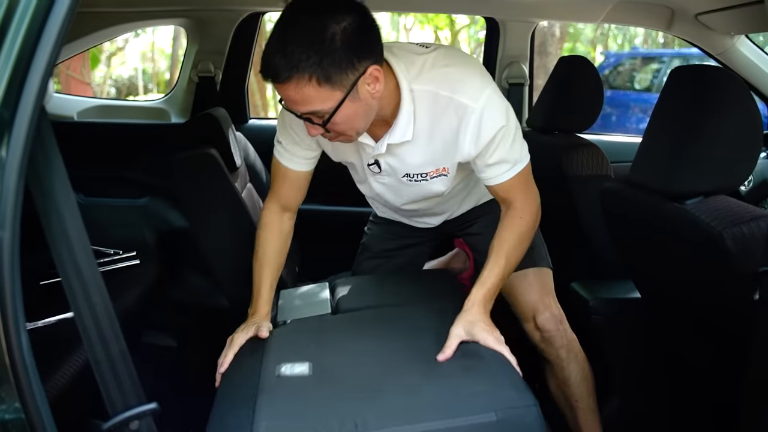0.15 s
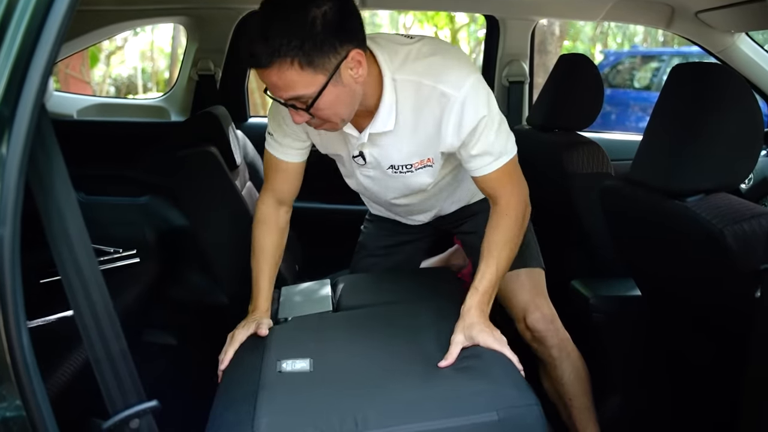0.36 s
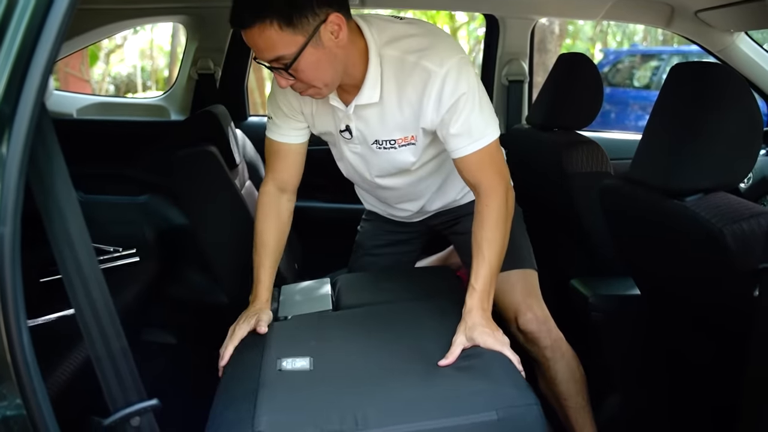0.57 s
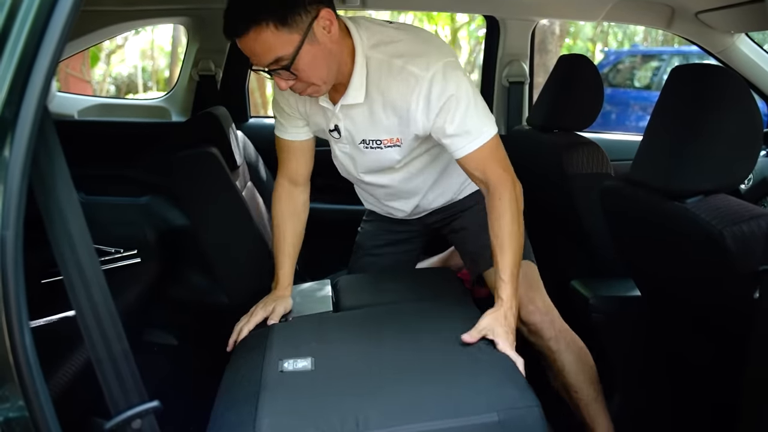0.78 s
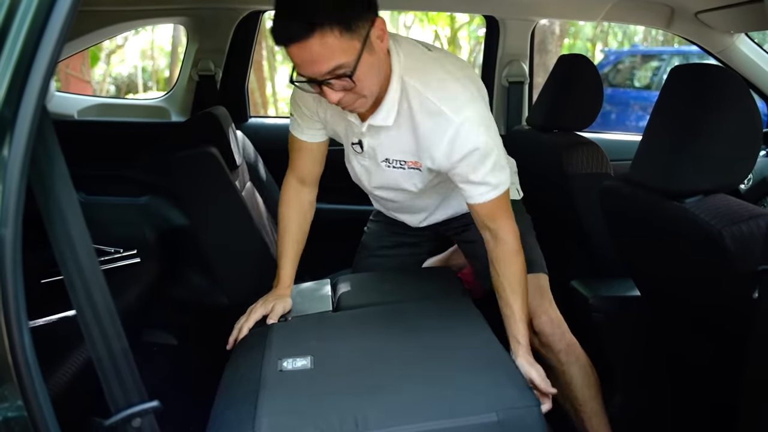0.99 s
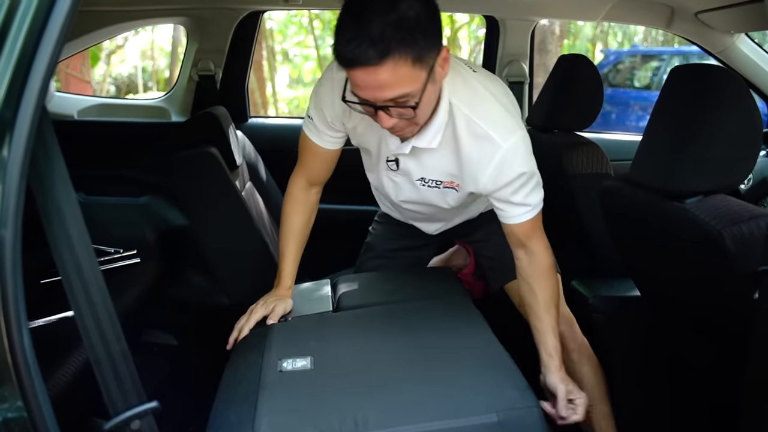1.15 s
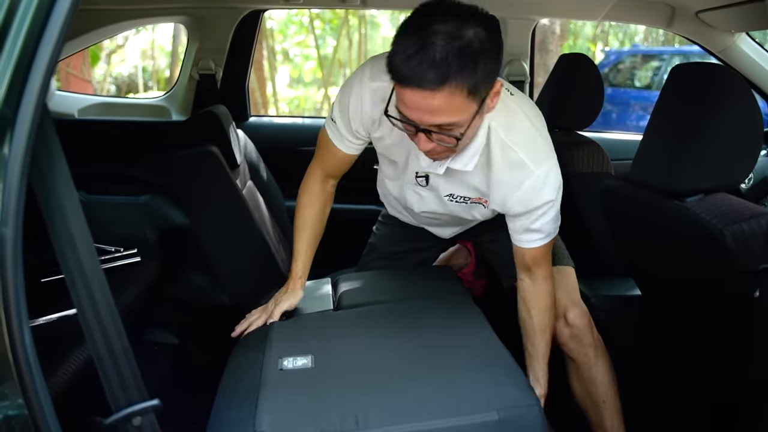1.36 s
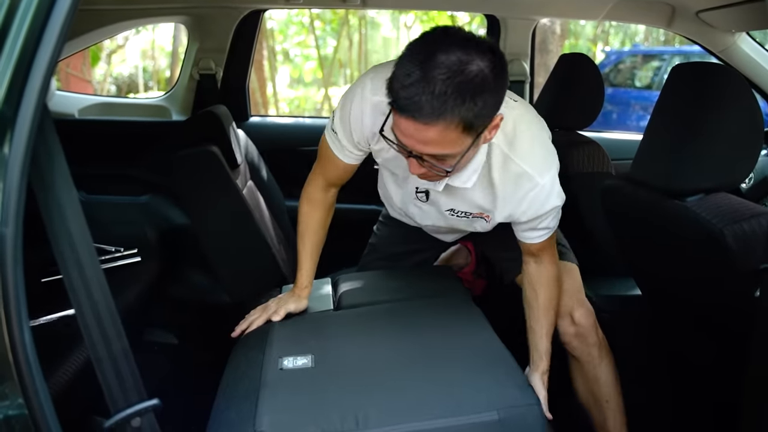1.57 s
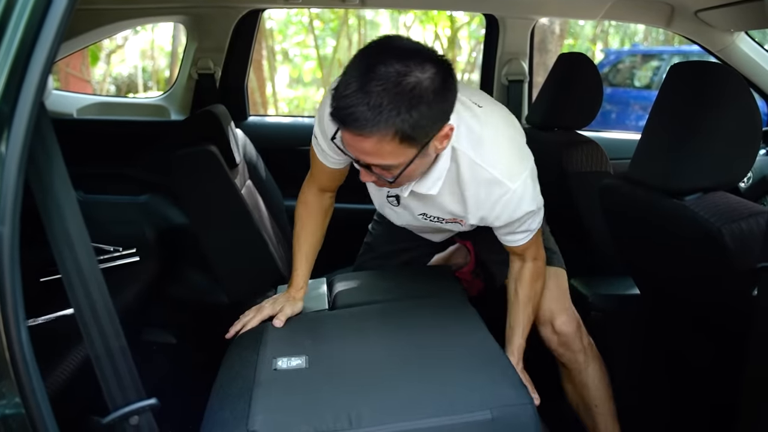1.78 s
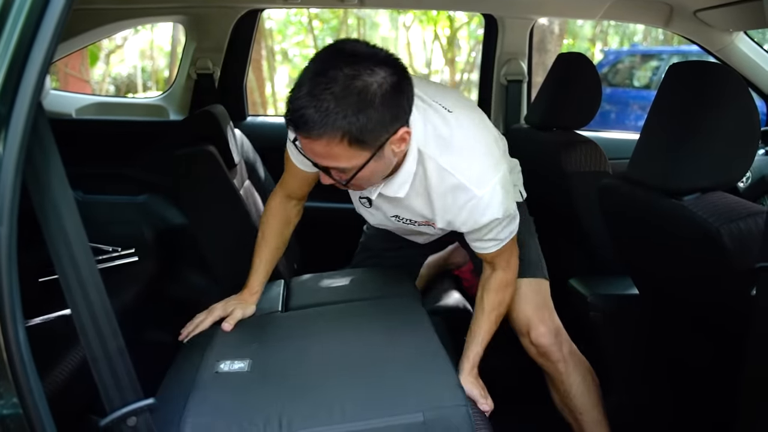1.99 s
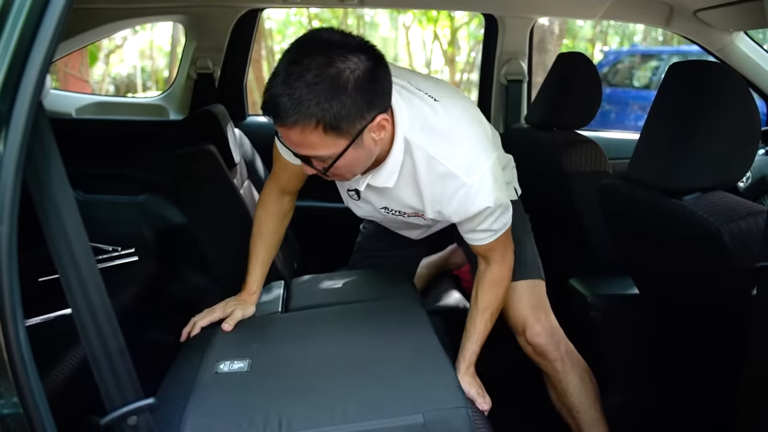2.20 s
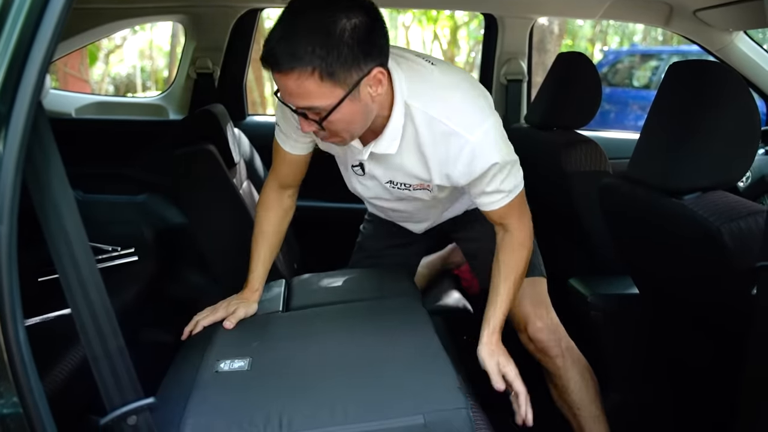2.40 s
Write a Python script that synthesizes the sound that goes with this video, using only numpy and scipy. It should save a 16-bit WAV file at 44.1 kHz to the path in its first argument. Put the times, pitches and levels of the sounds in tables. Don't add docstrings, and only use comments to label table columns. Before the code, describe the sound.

Folding car seat drops with a padded thump, light hand taps follow, then a latching clunk.

```python
import sys
import numpy as np
from scipy import signal
from scipy.fft import rfft, irfft
from scipy.io import wavfile
from scipy.ndimage import map_coordinates

SR = 44100
rng = np.random.default_rng(int(sys.argv[2]) if len(sys.argv) > 2 else 0)


def how_loud(loudness_db):
    steps = np.asarray(loudness_db, float) / 20
    return 10 ** steps


def transcribe(u):
    v = np.clip(np.atleast_2d(u).T, -1, 1)
    q = np.round(v * 32767).astype(np.int16)
    wavfile.write(sys.argv[1], SR, q)


N = 108045

# start_s, level_db, contact_ms, favoured_hz
KNOCKS = [(0.2037, -22, 0.86, 500), (.211, -21, 1.4, 557), (0.2168, -14, 0.92, 410),
          (.221, -17.5, 0.61, 252), (0.2245, -20, 0.14, 720), (.240, -14, 1.3, 252),
          (0.246, -20.5, 0.59, 286), (.252, -34, 0.73, 280), (0.261, -27, 0.84, 560),
          (0.271, -31.5, 0.39, 260), (.282, -28, 0.92, 600), (.288, -46, 1.2, 260), (0.3, -24, 2.4, 150),
          (2.039, -30, 0.31, 600), (2.0455, -19.5, 0.98, 400), (2.0492, -17.5, 0.8, 380),
          (2.0535, -19, 1.05, 397), (2.058, -16, 0.81, 380), (2.0625, -19, 0.69, 764),
          (2.066, -15, 0.53, 169), (2.082, -19.5, 1.2, 280), (2.0978, -24, 0.49, 730),
          (2.124, -29, 1.07, 450), (2.134, -23, 1.3, 314), (2.151, -26, 2, 150)]
# pitch_hz, level_db, fade_60db_s
FRAME_TONES = [(68, -22, 0.24), (98, -3.5, 0.079), (150, -3, 0.13), (205.2, -2, 0.1), (261.3, -1, 0.091),
               (301, 0.5, 0.083), (388.4, -3, 0.077), (464, -9, 0.055), (553.5, -1, 0.039),
               (607, -6.5, 0.09), (687.6, -3.5, 0.052), (781.5, -8.5, 0.078), (915, -7.5, 0.024),
               (1190, -29, 0.037)]
# peak_s, level_db, rise_s, fade_60db_s, contact_ms
SHUDDERS = [
    (0.242, -29.5, 0.021, 0.37, 1.3),
    (.42, -57, 0.11, 0.98, 2.13),
    (1.789, -52, 0.017, 0.11, 1.22),
    (1.93, -48, 0.035, 0.99, 1.7),
    (2.01, -42.5, 0.055, 0.71, 1),
    (2.1, -36, 0.039, 0.35, 0.3),
    (2.25, -49, 0.25, 0.79, 3.3),
]
# start_s, level_db, pitch_hz,
# fade_60db_s
TAPS = [(.2028, -15, 307, 0.019), (1.915, -44, 265, 0.14), (1.995, -36, 267, 0.089),
        (0.516, -43, 150.6, 0.16), (0.959, -47, 212, 0.081), (1.3289, -47.5, 410, 0.024),
        (1.363, -48, 474, 0.051), (1.415, -51, 569.5, 0.15), (1.424, -49.5, 565, 0.059),
        (1.431, -44, 271, 0.092), (1.439, -37.5, 207, 0.064), (1.5123, -44, 654, 0.018),
        (1.525, -46, 510, 0.022), (1.775, -51, 310.4, 0.051), (1.792, -54, 316, 0.032),
        (1.998, -46, 620, 0.035), (1.785, -65, 630, 0.043), (1.42, -58, 670, 0.092)]
# start_s, level_db, pitch_hz, fade_60db_s
CLINKS = [(0.2146, -35, 1186, 0.1), (0.2201, -32, 5630, 0.018), (0.233, -34, 3090, 0.082),
          (.26, -40, 1233, 0.069), (.281, -51, 6600, 0.027), (1.326, -62, 4900, 0.013),
          (1.5642, -58, 6160, 0.018), (1.5645, -75, 10800, .02), (2.046, -31, 1997, 0.057),
          (2.05, -36, 1590, 0.11), (2.064, -38, 5570, 0.025), (2.072, -40, 3620, 0.059)]
# peak_s, level_db, rise_s, fade_60db_s, brightness_db_per_octave
CRUNCHES = [(0.203, -45, 0.00082, .03, -8), (0.211, -35.5, 0.0013, 0.074, -3.5),
            (0.2204, -29.5, 0.0011, 0.012, 2), (.231, -29.5, 0.004, 0.085, 1),
            (.242, -33.5, 0.0035, 0.063, -1), (0.263, -44.5, 0.0025, 0.072, -1.5),
            (0.282, -48.5, 0.0028, 0.09, -0.5), (0.324, -53, 0.0032, .05, -3.5),
            (.35, -59, 0.011, 0.16, -3), (1.317, -65, 0.0095, 0.044, 3.5),
            (1.329, -55.5, 0.00061, 0.0043, 3), (1.365, -65, 0.00085, 0.062, 2),
            (1.423, -51, 0.0057, 0.051, 3.5), (1.513, -78, 0.00077, .02, -16),
            (1.565, -61, 0.0012, 0.026, 2), (1.64, -65, 0.0036, 0.052, 7.5), (2.019, -60, 0.036, 0.17, -9),
            (2.041, -39.5, .0008, 0.03, -2), (2.051, -28, 0.0047, 0.089, 0),
            (2.065, -32.5, 0.0023, 0.046, 1.5), (2.081, -48, .004, .06, -13),
            (2.097, -49, 0.0022, 0.11, -2), (2.126, -46.5, 0.0015, 0.059, -5),
            (2.151, -56.5, 0.0039, 0.1, -4)]
# pitch_hz, level_db_per_hz
CRUNCH_COLOUR = [(530, -59), (950, -13.5), (1250, -2), (1780, -13.5), (2030, -6.5), (5630, -12.5),
                 (12700, -25.5), (15800, -31.5)]
SPRING_HZ = [1497, 1990, 2449, 2519, 2799, 2934, 3359, 3715, 3752, 4269, 4366, 6900]
# level_db, fade_60db_s, damped_at_s
SPRING_TONES = [(-12, 4.1, 0.56), (-27, 5.6, 1), (-10.5, 11, 0.625), (-3, 7, 0.563), (-10, 3, 0.74),
                (-14, 4.1, 0.77), (-19, 6.8, 0.73), (-20, 8.1, 0.55), (-19, 6.2, 0.63), (-18, 7, 0.8),
                (-18.5, 4.3, 0.77), (-23, 1, 0.49)]
# start_s, pitch_hz, level_db, damped_at_s
REVIVALS = [
    (.61, 2449, -63, .73),
    (.635, 2519, -67, .72),
    (.71, 1497, -71, .77),
]
STRIKER_HZ = [4274, 6062, 6158, 3320]
# level_db, fade_60db_s, damped_at_s
STRIKER_TONES = [(-20.5, 1.5, 9), (-13, 0.23, 9), (-2, 0.48, 9), (-19.5, 1.6, 9)]
# start_s, pitch_hz, level_db, fade_60db_s, damped_at_s
PANEL_HUMS = [
    (.208, 125, -29, .5, .25),
    (.252, 95, -24, .9, .325),
    (.35, 95, -41, .9, .405),
    (.375, 262, -44, .55, 1),
    (.236, 275, -21, .3, .262),
    (2.048, 308, -18.5, .4, 2.074),
    (2.08, 295, -29, .4, 2.105),
    (2.138, 105, -30, .5, 2.18),
    (2.175, 256, -39, .6, 3),
]
# middle_s, level_db, half_width_s, brightness_db_per_octave
BRUSHES = [(.5, -70, 0.29, -2.5), (.11, -67.5, 0.074, -2), (.78, -63.5, 0.034, -0.5),
           (.88, -63.5, 0.062, -3.5), (.95, -68, 0.032, -2.5), (1.21, -68.5, 0.031, -1.5),
           (1.39, -69.5, 0.032, 0.5), (1.048, -71, 0.17, -4), (1.608, -65, 0.019, -2.5),
           (1.72, -74, 0.067, 1), (2.014, -49, 0.05, -6)]
# pitch_hz, level_db_per_hz
CLOTH_COLOUR = [(350, -36), (600, -3), (697, -14.5), (1070, -10.5), (1140, -15.5), (3750, -11.5),
                (15800, -25.5)]
# start_s, length_s, start_hz, middle_hz, end_hz
BIRD_NOTES = [
    (1.12, .04, 9800, 10250, 9700),
    (1.145, .04, 14300, 13600, 12600),
    (1.52, .078, 4350, 4800, 6400),
]
BIRD_DB = [-79, -85, -72]
# pitch_hz, level_db_per_hz
RUMBLE_COLOUR = [(15, -87), (25, -43), (80, -9), (122, 0.5), (262, -6.5), (323, -13.5), (525, -16.5),
                 (703, -25.5), (1200, -36), (1560, -78.5), (2640, -120)]
# pitch_hz, level_db_per_hz
AIR_COLOUR = [(350, -54), (600, -9), (697, -2), (1790, -9), (4400, -11.5), (5000, -17), (13500, -27.5),
              (15800, -39)]
# pitch_hz, level_db
MIC_BASS = [(20, -33), (60, -6.5), (110, 0)]
# pitch_hz, level_db
TREBLE_LIMIT = [(15600, 0), (15850, -90)]

SHUDDER_PER_S = 1500
FAVOUR_DB = 4
SPRING_S, SPRING_DB = 0.25, -53
STRIKER_S, STRIKER_DB = 2.07, -57
RUMBLE_DB, AIR_DB = -58, -69
CABIN_T60_S, CABIN_DB = 0.15, -8.5


def unit(x):
    return x / np.sqrt(np.mean(x ** 2) + 1e-20)


def coloured(x, points, tilt_db=0):
    hz = np.fft.rfftfreq(len(x), 1 / SR) + 1
    point_hz, point_db = np.transpose(points)
    level_db = np.interp(np.log(hz), np.log(point_hz), point_db) + tilt_db * np.log2(hz / 4000)
    return irfft(rfft(x) * how_loud(level_db), len(x))


def wobble(rate, size=N):
    knots = rng.standard_normal(int(size * rate / SR) + 4)
    return map_coordinates(knots, [np.arange(size) * rate / SR])


def swell(s, rise, t60):
    t = np.arange(N) / SR - s
    growing = np.exp(-0.5 * (t / max(rise, 1e-4)) ** 2)
    fading = how_loud(-60 * np.abs(t) / max(t60, 1e-3))
    return np.where(t < 0, growing, fading)


def grit(spiky_db, size=N):
    return unit(rng.standard_normal(size) * how_loud(spiky_db * wobble(1500, size=size)))


def pressed(x, ms):
    push = np.hanning(int(ms * SR / 1000) + 3)
    return signal.fftconvolve(x, push / push.sum())[:len(x)]


def frame_modes():
    t = np.arange(SR // 2) / SR
    hz, level, t60 = np.transpose(FRAME_TONES)[:, :, None]
    return how_loud(level - 60 * t / t60) * np.sin(2 * np.pi * hz * t)


def knocks(modes):
    out = np.zeros(N + SR)
    hz = np.transpose(FRAME_TONES)[0]
    for s, db, ms, near_hz in KNOCKS:
        size, side = rng.standard_normal((2, len(FRAME_TONES)))
        strength = how_loud(1.54 * size - FAVOUR_DB * np.log2(hz / near_hz) ** 2)
        ring = (strength * np.sign(side + 0.33)) @ modes
        start = round((s - ms / 1000) * SR)
        out[start:][:len(ring)] += 0.64 * how_loud(db) * pressed(ring, ms)
    return out[:N]


def shudders(modes):
    out = np.zeros(N)
    t = np.arange(SR // 2) / SR
    signs = (-1.) ** np.arange(len(FRAME_TONES))
    body = signs @ modes * how_loud(-60 * t / 0.27)
    for s, db, rise, t60, ms in SHUDDERS:
        impacts = (rng.random(N) < SHUDDER_PER_S / SR) * rng.standard_normal(N)
        felt = pressed(body, ms)
        felt = felt / np.linalg.norm(felt)
        out += signal.fftconvolve(how_loud(db) * swell(s, rise, t60) * unit(impacts), felt)[:N]
    return out


def taps_and_clinks():
    out = np.zeros(N + SR)
    t = np.arange(SR // 2) / SR
    for s, db, hz, t60 in TAPS + CLINKS:
        tone = np.sin(2 * np.pi * hz * t) + 0.5 * np.sin(2 * np.pi * 1.45 * hz * t)
        onset = 1 - np.exp(-4 * hz * t)
        out[round(s * SR):][:len(t)] += how_loud(db - 60 * t / t60) * tone * onset
    return out[:N]


def crunch():
    out = np.zeros(N)
    lead, span = 4096, 16384
    for s, db, rise, t60, tilt in CRUNCHES:
        start = round(s * SR) - lead
        near = slice(start, start + span)
        noise = unit(coloured(grit(1.4, size=span), CRUNCH_COLOUR, tilt))
        out[near] += how_loud(db) * swell(s, rise, t60)[near] * noise
    return out


def cabin(x):
    t = np.arange(SR // 4) / SR
    colour = [(200, 28), (1500, 2.5), (14000, -0.5)]  # Hz, dB
    tail = coloured(rng.standard_normal(len(t)), colour) * how_loud(-60 * t / CABIN_T60_S)
    return x + how_loud(CABIN_DB) * signal.fftconvolve(x, tail / np.linalg.norm(tail))[:N]


def steel(pitches, modes, s, db, waver_db, sway):
    t = np.clip(np.arange(N) / SR - s, 0, None)
    ring = np.zeros(N)
    for hz, (level, t60, stop) in zip(pitches, modes):
        waver = waver_db * (1 - level / 7) * wobble(22)
        tone = np.sin(2 * np.pi * hz * t + sway * wobble(30))
        damping = 1 + np.exp(np.clip((t + s - stop) / 0.012, -50, 50))
        ring += how_loud(level - 60 * t / t60 + waver) * tone / damping
    return how_loud(db) * ring * (1 - np.exp(-t / 0.01))


def springs():
    out = steel(SPRING_HZ, SPRING_TONES, SPRING_S, SPRING_DB, waver_db=0.8, sway=0.5)
    for s, hz, db, stop in REVIVALS:
        out += steel([hz], [(0, 3, stop)], s, db, waver_db=0.8, sway=0.4)
    return out


def striker():
    return steel(STRIKER_HZ, STRIKER_TONES, STRIKER_S, STRIKER_DB, waver_db=1.2, sway=0.5)


def floor_panels():
    out = np.zeros(N)
    for s, hz, db, t60, stop in PANEL_HUMS:
        out += steel([hz], [(0, t60, stop)], s, db, waver_db=1, sway=0.15)
    return out


def cloth():
    out = np.zeros(N)
    t = np.arange(N) / SR
    for s, db, width, tilt in BRUSHES:
        stroke = np.exp(-0.5 * ((t - s) / width) ** 2)
        out += how_loud(db) * stroke * unit(coloured(grit(1.8), CLOTH_COLOUR, tilt))
    return out


def birds():
    out = np.zeros(N)
    for (s, length, *hz), db in zip(BIRD_NOTES, BIRD_DB):
        u = np.linspace(0, 1, round(length * SR))
        pitch = np.polyval(np.polyfit([0, 0.5, 1], hz, 2), u)
        whistle = np.sin(2 * np.pi * np.cumsum(pitch) / SR)
        breath = how_loud(db + 2 * wobble(230)[:len(u)]) * np.sin(np.pi * u) ** 0.42
        out[round(s * SR):][:len(u)] += breath * whistle
    return out


def ambience():
    rumble = unit(coloured(rng.standard_normal(N), RUMBLE_COLOUR)) * how_loud(RUMBLE_DB + wobble(14))
    air = unit(coloured(rng.standard_normal(N), AIR_COLOUR)) * how_loud(AIR_DB + 0.6 * wobble(6))
    return rumble + air


def scene():
    modes = frame_modes()
    frame = knocks(modes) + shudders(modes) + taps_and_clinks()
    mix = coloured(frame, MIC_BASS) + cabin(crunch())
    mix += springs() + striker() + floor_panels()
    mix += cloth() + birds() + ambience()
    return mix[None]


def roll_off(x):
    return signal.sosfilt(signal.butter(12, 15830, fs=SR, output="sos"), x)


def record(dry):
    mix = coloured(dry[0], TREBLE_LIMIT)[None]
    return roll_off(mix)


dry = scene()
out = record(dry)
transcribe(out)
```